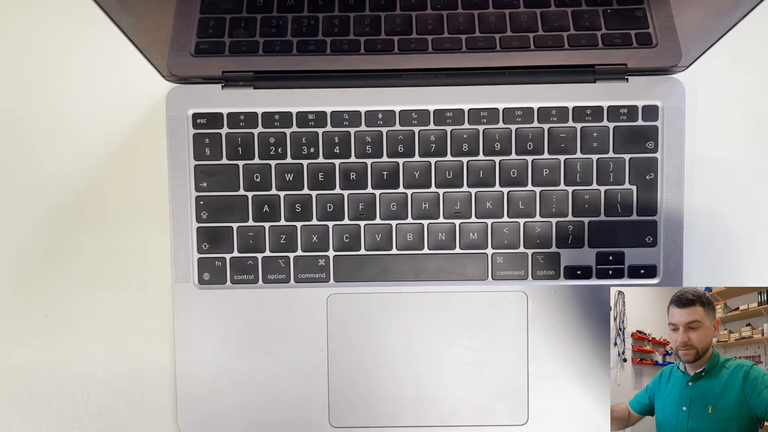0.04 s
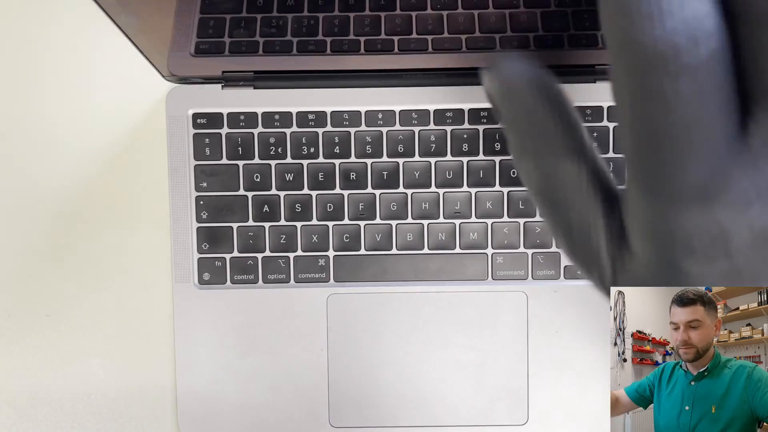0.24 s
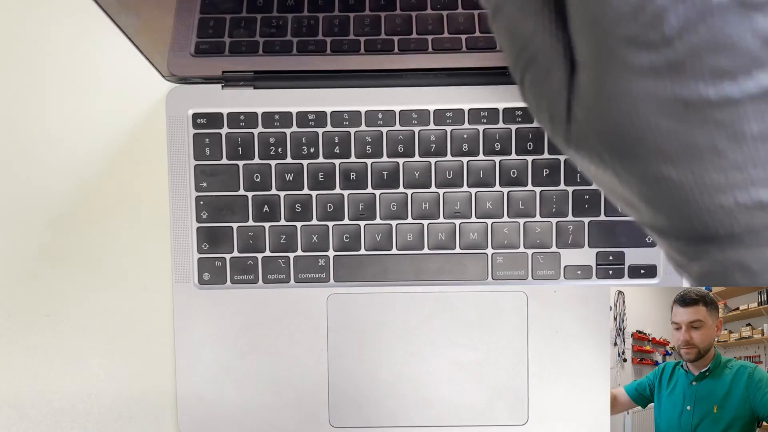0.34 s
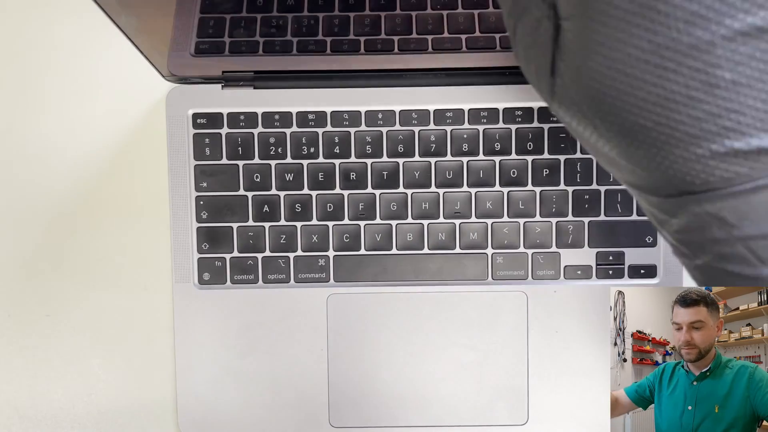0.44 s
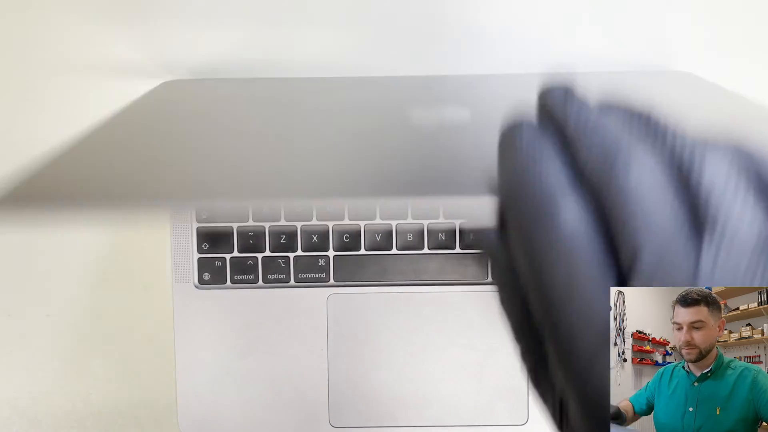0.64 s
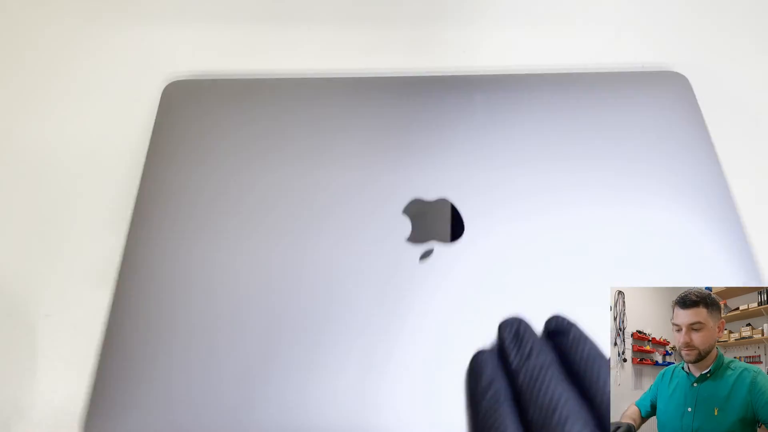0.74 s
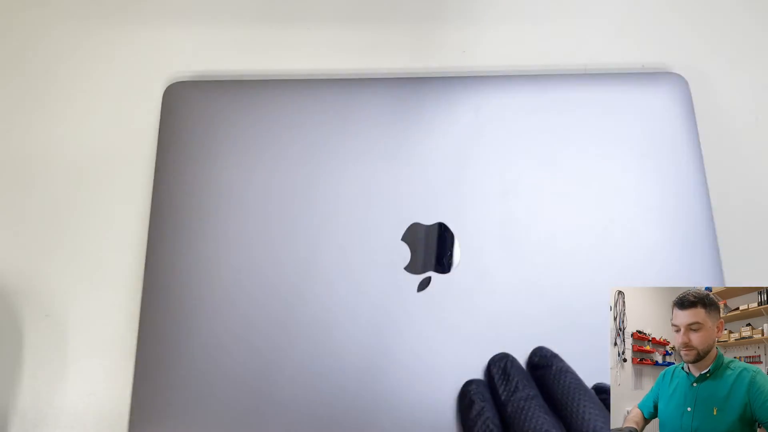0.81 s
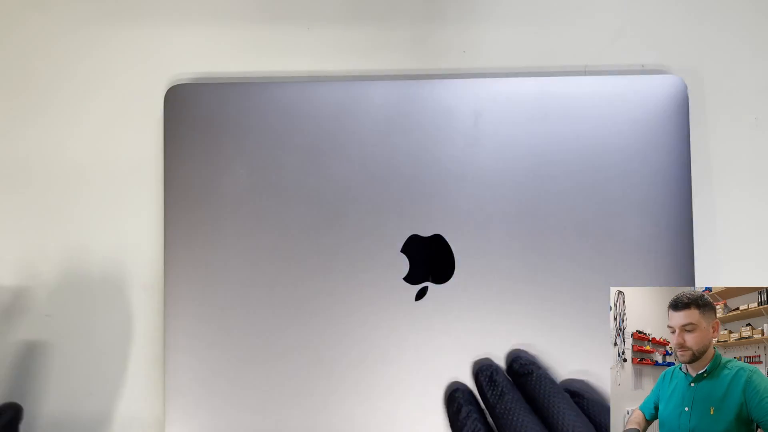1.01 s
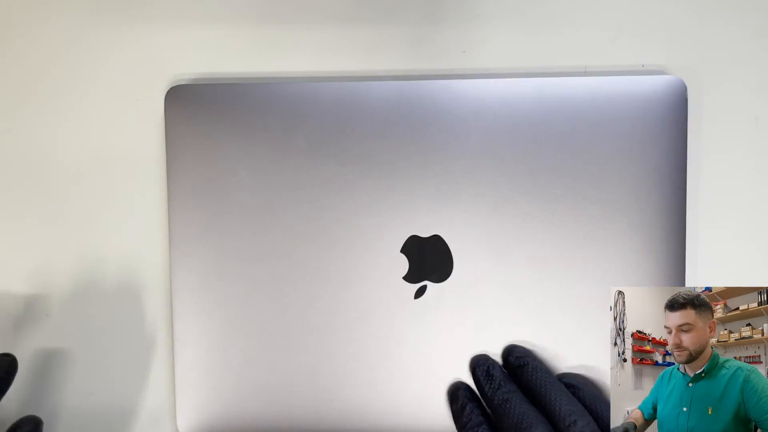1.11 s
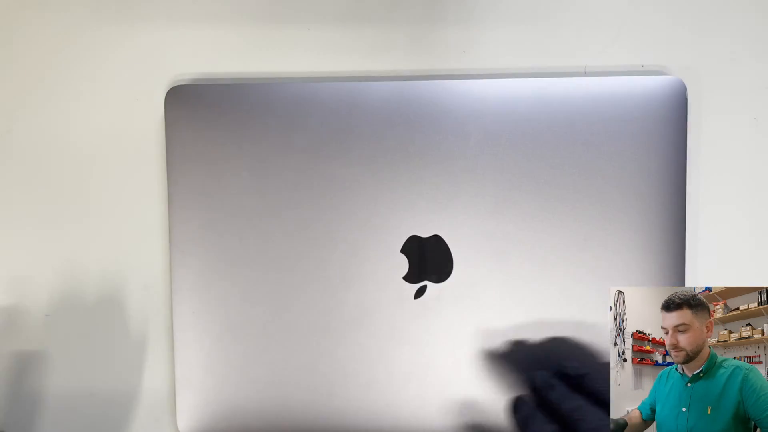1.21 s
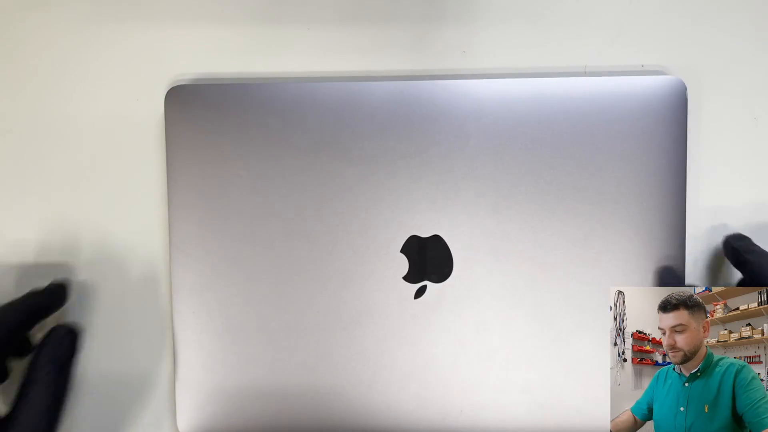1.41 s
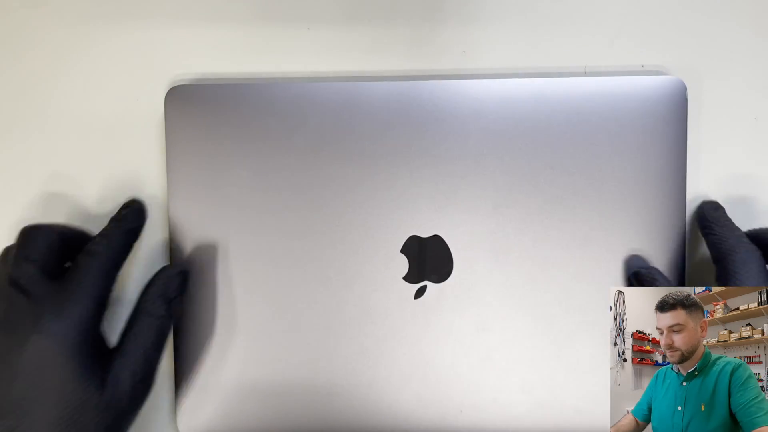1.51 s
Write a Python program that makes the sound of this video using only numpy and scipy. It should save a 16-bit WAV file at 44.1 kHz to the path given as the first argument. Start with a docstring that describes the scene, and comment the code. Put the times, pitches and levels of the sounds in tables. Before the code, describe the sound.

A metal laptop lid snaps shut, then the laptop knocks down on a table.

```python
"""Shutting and turning a laptop

A gloved hand shuts a metal laptop on a table in a small room: the hinge ticks, the lid snaps down
and rings the case, and the glove slides off. The laptop is turned round, a rubber foot judders
briefly, and its edge drops on the table, which booms. A low hum and a faint hiss go on throughout.
The snap overloads the close stereo microphone."""
import sys
import numpy as np
from scipy import signal
from scipy.fft import rfft, irfft
from scipy.io import wavfile

SR = 44100
rng = np.random.default_rng(int(sys.argv[2]) if len(sys.argv) > 2 else 0)


def master_out(mix):
    """Clip the mix to full scale and print it as 16-bit PCM to the path in sys.argv[1]."""
    frames = np.transpose(np.atleast_2d(mix))
    ceiling = np.clip(frames, -1, 1)
    pcm = np.round(ceiling * 32767).astype(np.int16)
    wavfile.write(sys.argv[1], SR, pcm)


N = 68355
T = np.arange(N) / SR
FREQS = np.maximum(np.fft.rfftfreq(2 * N, 1 / SR), 1)
WIDE_HZ, NEAR_WIDE_HZ = 1500, 9000  # left and right differ above this: spread-out sound, direct sound


def amp(db):
    """Turn decibels into a multiplier."""
    return 10 ** (np.asarray(db) / 20)


def unit(x):
    """Scale a signal to an average (rms) level of 1."""
    return x / np.sqrt(np.mean(x ** 2))


def lookup(table, hz, column=1):
    """Read a table at any pitch, blending between its rows."""
    rows = np.array(table, float)
    return np.interp(np.log(hz), np.log(rows[:, 0]), rows[:, column])


def shape(x, gain):
    """Filter a sound: turn each frequency up or down."""
    return irfft(rfft(x, 2 * N) * gain)[..., :N]


def resonance(hz, width_hz):
    """A filter curve that favours the frequencies around one pitch."""
    return 1 / (1 + 1j * (FREQS ** 2 - hz ** 2) / (FREQS * width_hz))


def fade(decay_s, start_s=0):
    """Start suddenly, then fall by 60 dB in decay_s."""
    return (T >= start_s) * np.exp(-np.log(1000) * np.maximum(T - start_s, 0) / decay_s)


def swell(start_s, rise_s, hold_s, fall_s):
    """Rise smoothly, hold, and fall back to silence."""
    corners_s = start_s + np.cumsum([0, rise_s, hold_s, fall_s])
    return np.sin(np.pi / 2 * np.interp(T, corners_s, [0, 1, 1, 0])) ** 2


def bumps(table):
    """A loudness curve with one bell-shaped bump for each row."""
    return sum(amp(db) * np.exp(-.5 * ((T - peak_s) / spread_s) ** 2) for peak_s, spread_s, db in table)


def pan(db):
    """Make the left side louder than the right by db."""
    return amp(np.array([[1], [-1]]) * db / 2)


def noise(wide_hz):
    """Stereo noise: both sides share the bass but differ in the treble."""
    mid, side = rng.standard_normal((2, N))
    width = np.sqrt(FREQS / (FREQS + wide_hz))
    return unit(mid + shape(side, width) * np.array([[1], [-1]]))


def wobble(rate_hz):
    """A smooth random wander, about 1 in size."""
    return unit(shape(rng.standard_normal(N), 1 / (1 + (FREQS / rate_hz) ** 2) ** 2))


def bands(wide_hz):
    """Cut stereo noise into equally loud half-octave bands, as (pitch, sound)."""
    source = noise(wide_hz)
    for hz in 250 * 2 ** (np.arange(13) / 2):
        yield hz, unit(shape(source, np.maximum(1 - np.abs(2 * np.log2(FREQS / hz)), 0)))


def arrival(hz, spread_s):
    """Bending waves travel faster at high pitch, so the lows come late."""
    return spread_s * max(np.sqrt(1000 / hz) - np.sqrt(1000 / 12000), 0)


def burst(table, spread_s):
    """The noise of a hit, dying away at its own rate in each band."""
    return sum(band * amp(lookup(table, hz)) * fade(lookup(table, hz, column=2), arrival(hz, spread_s))
               for hz, band in bands(NEAR_WIDE_HZ))


def ring(tones, spread_s, right_lag_s=.00003):
    """The fading tones of a struck object, reaching the left of the microphone first."""
    lag_s = np.array([[0], [right_lag_s]])
    out = 0
    for hz, db, decay_s in tones:
        start_s = arrival(hz, spread_s)
        out = out + amp(db) * fade(decay_s, start_s) * np.sin(2 * np.pi * hz * (T - start_s - lag_s))
    return out


def strike(sound, hits):
    """Play a sound at the time and level of each hit."""
    return sum(amp(db) * np.pad(sound, ((0, 0), (int(start_s * SR), 0)))[:, :N] for start_s, db in hits)


# Tones of the hum: pitch_hz, level_db
HUM_TONES = [(200, -56), (253, -56.5), (360, -65)]
# Tone colour of the background noise: pitch_hz, gain_db
AIR_COLOUR = [(25, -8.5), (70, 4), (130, -3.5), (280, -4), (450, -18), (900, -25), (2000, -29.5),
              (3200, -39.5), (7000, -43), (9000, -30.5), (12000, -42.5)]

def room_tone():
    """A wavering hum over a low rumble and a faint hiss."""
    hum = 0
    for hz, db in HUM_TONES:
        peak = np.sqrt(2) * amp(db + 1.9 * wobble(10))
        hum = hum + peak * np.sin(2 * np.pi * hz * T + 0.79 * wobble(8))
    air = unit(shape(noise(WIDE_HZ), amp(lookup(AIR_COLOUR, FREQS))))
    return hum + amp(-48.5) * air


# Soft strokes of the gloves: peak_s, spread_s, level_db
BRUSH_STROKES = [(.09, 0.2, -51.5), (0.378, 0.099, -50.5), (0.538, 0.042, -55.5), (.72, 0.0953, -65),
                 (0.879, 0.029, -54.5), (1.03, 0.017, -61), (1.4, 0.055, -57.5), (1.55, .03, -57.5)]
# Tone colour of the brushing: pitch_hz, gain_db
BRUSH_COLOUR = [(300, -4), (1200, 4), (2500, -1.5), (4000, 1), (6000, -0.5), (9000, 6.5), (12000, -6)]

def glove_brushing(grain_db=2.8):
    """Gloves rub lightly on the laptop with a grainy hiss."""
    hiss = unit(shape(noise(WIDE_HZ), amp(lookup(BRUSH_COLOUR, FREQS))))
    return hiss * bumps(BRUSH_STROKES) * amp(grain_db * wobble(200))


# Moments when the laptop shifts: peak_s, spread_s, level_db
SHIFTS = [(.05, 0.037, -46.5), (.57, 0.053, -45.5), (1.39, 0.057, -50.5)]

def shifting():
    """The pressure of the hands rumbles through the table top."""
    rumble = unit(shape(noise(WIDE_HZ), resonance(75.1, width_hz=90) ** 2))
    return rumble * bumps(SHIFTS)


# Small clicks: start_s, level_db, pitch_hz, decay_s
TICKS = [(0.007, -38, 2785, 0.017), (0.035, -37.5, 550, 0.026), (0.0374, -34.5, 3510, 0.019),
         (0.1, -35.5, 5800, .015), (0.1168, -36, 4870, 0.011), (0.127, -40, 1200, 0.082),
         (0.4982, -35.5, 6560, 0.015), (0.561, -45.5, 6600, 0.077), (0.798, -58, 1510, 0.017),
         (1.274, -45.5, 5000, 0.028), (1.324, -50.5, 6950, .01), (1.477, -52.5, 4480, .02)]
# Tone colour of their echo: pitch_hz, gain_db
TICK_ECHO = [(250, -55), (700, -41), (2500, -47), (10000, -44)]

def ticks(sharpness=0.99):
    """The hinge and fingertips make tiny bursts of noise, and the room echoes them."""
    clicks = 0
    for start_s, db, hz, decay_s in TICKS:
        click = shape(noise(NEAR_WIDE_HZ) * fade(decay_s, start_s), resonance(hz, hz / sharpness))
        make_up = np.sqrt(SR / np.pi / hz)  # restores the level that the filter takes away
        clicks = clicks + amp(db) * make_up * click
    echoes = signal.fftconvolve(clicks, room_echo(TICK_ECHO), axes=1)[:, :N]
    return (clicks + echoes) * pan(3.5)


# How long the room rings: pitch_hz, decay_s
ROOM_DECAY = [(100, .3), (400, 0.19), (1500, 0.25), (4000, .26), (10000, 0.18)]

def room_echo(colour, delay_s=0.0053):
    """The room answers a hit with a rush of early reflections and a short tail."""
    tail = sum(band * amp(lookup(colour, hz)) * fade(lookup(ROOM_DECAY, hz))
               for hz, band in bands(WIDE_HZ))
    early_boost = 1 + amp(-10.5) * fade(.08)
    return tail * early_boost * (T > delay_s)


# Pushes on the table: start_s, level_db
TABLE_PUSHES = [(0.012, -17), (0.238, -16), (0.266, -13), (0.505, -16), (0.547, -18), (1.225, -4),
                (1.238, 0)]
# Tones of the table top: pitch_hz, level_db, decay_s
TABLE_TONES = [(34, -31, 0.12), (61.4, -32, 0.21), (83.6, -25, .32), (111.5, -23, 0.3),
               (131.3, -25.5, 0.27)]

def table_boom(rise_s=0.014):
    """The table top booms as the laptop's weight moves or lands on it."""
    boom = ring(TABLE_TONES, spread_s=0) * (1 - fade(rise_s))
    return strike(boom, TABLE_PUSHES)


# Soft taps on the open case: start_s, level_db
CASE_TAPS = [(0.0323, -26.5), (0.036, -21), (0.127, -37.5)]
# The lid meeting the base: start_s, level_db
LID_SNAPS = [(0.2205, 0), (0.2312, -21)]
# Tones of the metal case: pitch_hz, level_db, decay_s
CASE_TONES = [(290, -26.5, 0.028), (584, -25.5, 0.068), (910, -25, 0.036), (1200, -28, 0.013),
              (1656, -12.5, .04), (1833, -20.5, 0.017), (2220, -18, .03), (2752, -15.5, 0.054),
              (2992, -11, .028), (3410, -18.5, 0.013), (5560, -1.5, 0.0044), (6700, -4.5, 0.0094),
              (9347, 3, .012), (11400, -6.5, 0.0032)]
# Noisy crack of the lid: pitch_hz, level_db, decay_s
LID_CRACK = [(250, -39, .04), (513, -27, 0.013), (1010, -22.5, 0.026), (2000, -16.5, 0.055),
             (3970, -9.5, 0.012), (8000, -6, .012), (12000, -9, .01)]
# Tone colour of its echo: pitch_hz, level_db
LID_ECHO = [(250, -37.5), (450, -39.5), (900, -34.5), (1700, -26.5), (3000, -27), (4500, -25.5),
            (8000, -22), (12000, -26.5)]
# How far left the sound sits: pitch_hz, left_minus_right_db
LID_PAN = [(300, 0.5), (1000, 4.5), (4000, 3), (8500, 2.5), (12000, -1)]

def lid(spread_s=.003, tap_top_hz=3260):
    """Soft taps sound the case; then the lid cracks against the base and rings it hard."""
    hit = ring(CASE_TONES, spread_s) + burst(LID_CRACK, spread_s) + room_echo(LID_ECHO)
    hit = shape(hit, pan(lookup(LID_PAN, FREQS)))
    soft_hit = shape(hit, 1 / np.sqrt(1 + (FREQS / tap_top_hz) ** 6))
    return strike(soft_hit, CASE_TAPS) + strike(hit, LID_SNAPS)


# Pitches that the rubbed lid favours: pitch_hz, width_hz, gain_db
SLIDE_RESONANCES = [(524, 30, 9), (690, 144, 1), (1032, 110, 9), (1280, 42, 12.5), (1620, 270, 6),
                    (2250, 570, 7.5), (2580, 270, -13)]

def glove_slide(top_hz=2870, grain_db=1.35):
    """The glove slides off, and its grainy rubbing sounds the lid."""
    colour = sum(amp(db) * resonance(hz, width_hz) for hz, width_hz, db in SLIDE_RESONANCES)
    treble_cut = 1 / np.sqrt(1 + (FREQS / top_hz) ** 10)
    rubbing = noise(WIDE_HZ) * amp(grain_db * wobble(140))
    slide = unit(shape(rubbing, colour * treble_cut))
    return amp(-39) * slide * swell(start_s=0.273, rise_s=0.053, hold_s=0.075, fall_s=0.13) * pan(3.5)


def rubber_foot(start_s=0.8887, pitch_hz=122, sag_hz_per_s=130):
    """A rubber foot sticks and slips on the table: a short low tone that sags in pitch."""
    hz = pitch_hz - sag_hz_per_s * np.clip(T - start_s, 0, .1)
    phase = 2 * np.pi * np.cumsum(hz) / SR
    tone = np.sin(phase) + amp(-23) * np.sin(2 * phase)
    return amp(-25) * tone * swell(start_s, rise_s=0.031, hold_s=0.028, fall_s=0.047)


# The edge meeting the table: start_s, level_db
EDGE_HITS = [(1.2096, -9), (1.2112, 0)]
# Tones of the laptop on the table: pitch_hz, level_db, decay_s
LAPTOP_TONES = [(252, -29, 0.073), (562, -22.5, 0.057), (605, -16, 0.038), (1135, -17, 0.018),
                (1260, -15, 0.012), (2316, -19.5, 0.014), (3510, -29.5, 0.021)]
# Noise of the knock: pitch_hz, level_db, decay_s
EDGE_NOISE = [(249, -27.5, 0.075), (506, -34.5, 0.058), (1192, -37.5, .02), (2630, -29.5, .02),
              (5103, -41.5, 0.015), (10800, -30, 0.0047)]
# Tone colour of its echo: pitch_hz, level_db
EDGE_ECHO = [(250, -33.5), (600, -42.5), (1200, -43), (2500, -42.5), (5000, -52), (11000, -50.5)]

def edge_landing(spread_s=.0018):
    """The laptop's edge touches the table, then lands with a knock duller than the snap."""
    knock = ring(LAPTOP_TONES, spread_s) + burst(EDGE_NOISE, spread_s)
    return strike(knock * pan(2.1) + room_echo(EDGE_ECHO), EDGE_HITS)


def scene():
    """Add up all the sounds that reach the microphone."""
    return (room_tone() + glove_brushing() + shifting() + ticks() + table_boom()
            + lid() + glove_slide() + rubber_foot() + edge_landing())


# How strongly the microphone picks up each pitch: pitch_hz, gain_db
MIC_COLOUR = [(20, -0.5), (9600, -2), (10200, -8.5), (11000, 6), (11800, 0), (12800, -14), (14000, -37.5),
              (16000, -38)]

def record(dry, top_hz=15900):
    """The microphone colours the treble, the snap overloads it, and the very top is cut."""
    coloured = shape(dry, amp(lookup(MIC_COLOUR, FREQS)))
    clipped = np.clip(coloured, -1, 1)
    treble_cut = signal.ellip(8, .2, 70, top_hz, fs=SR, output="sos")
    return signal.sosfilt(treble_cut, clipped)


dry = scene()
out = record(dry)
master_out(out)
```